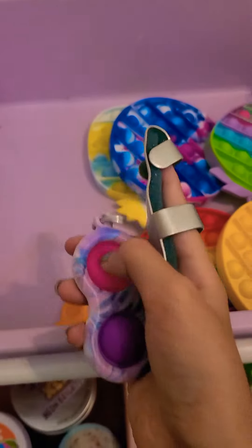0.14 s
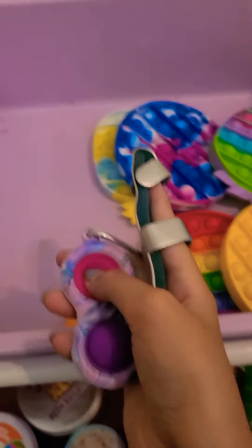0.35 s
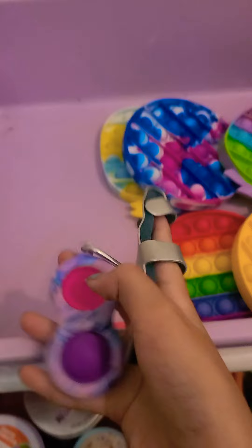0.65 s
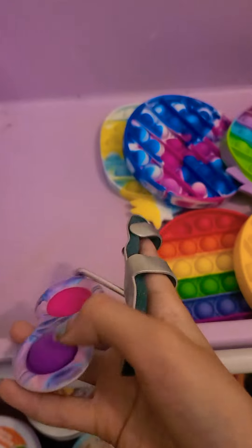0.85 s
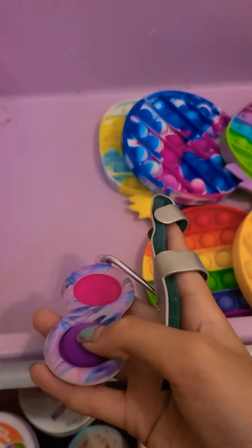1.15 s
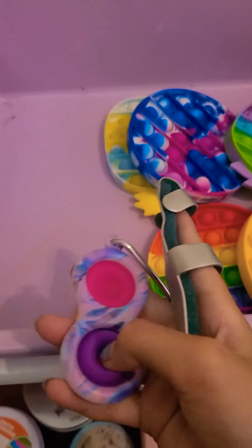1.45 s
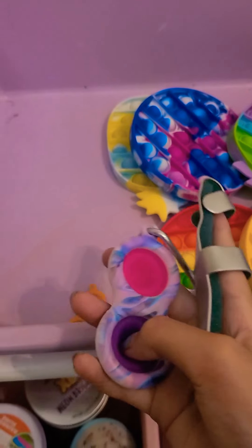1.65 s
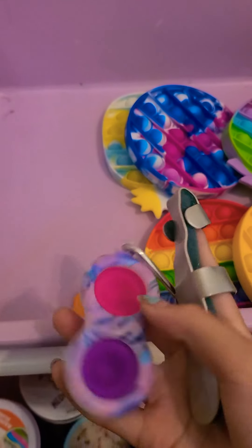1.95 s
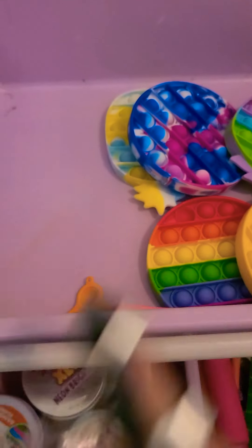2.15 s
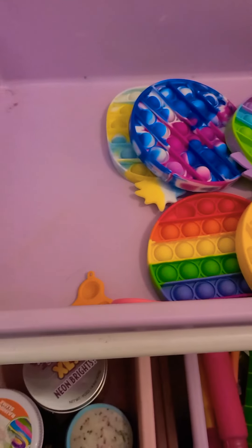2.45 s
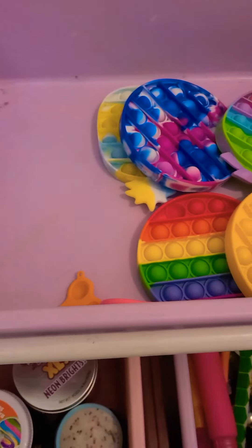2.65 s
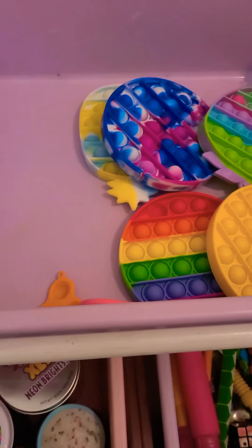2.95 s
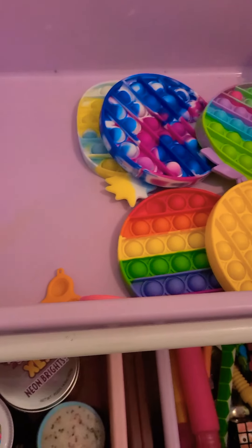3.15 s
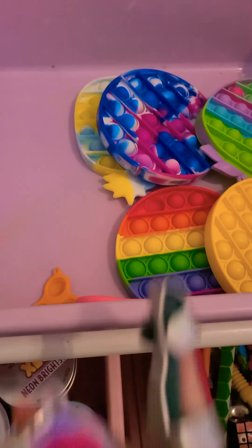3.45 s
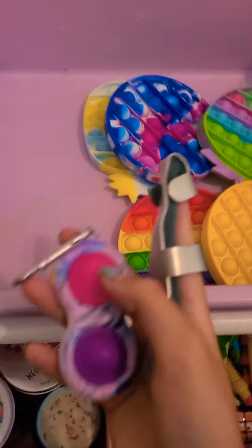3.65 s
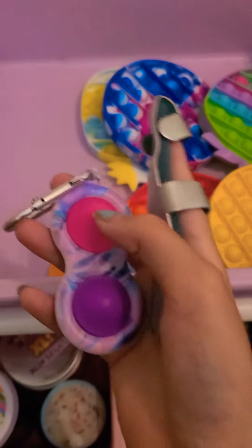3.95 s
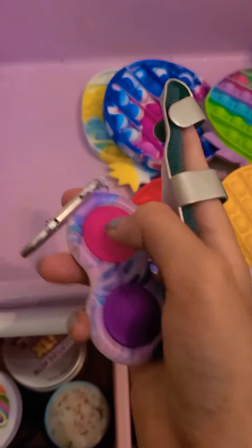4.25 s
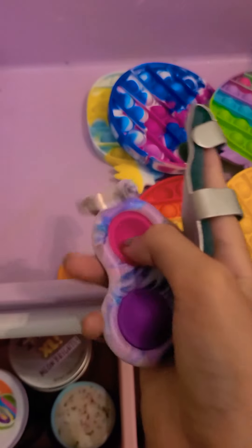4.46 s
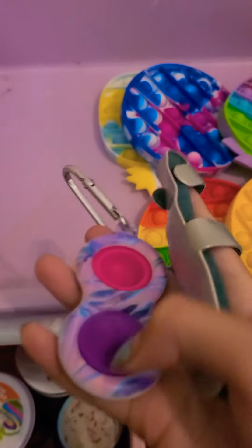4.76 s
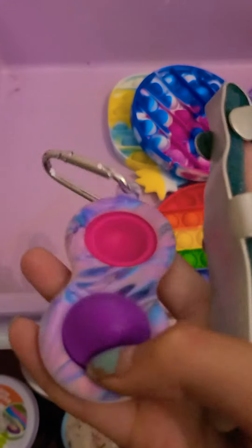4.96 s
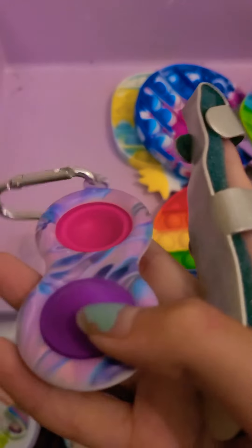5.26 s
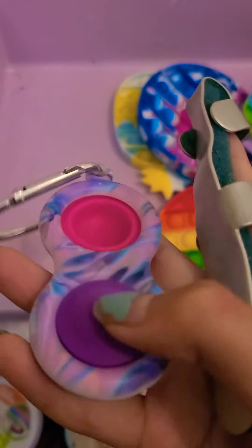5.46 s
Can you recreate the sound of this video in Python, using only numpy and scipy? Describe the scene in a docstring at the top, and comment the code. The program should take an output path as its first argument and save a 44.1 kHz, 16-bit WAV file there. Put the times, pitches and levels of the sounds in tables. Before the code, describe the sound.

A small furnished room, heard close by a phone in stereo, with faint steady mains hum around 120 Hz, low rumble and thin hiss throughout. A silicone bubble toy with a hard frame and metal key clip is handled. Light bright clinks come at 0.1 and 0.25 s, then a stronger clink and a rounded, dull dome pop together at 0.45 s. Faint ticks follow at 0.6 and 0.9 s. A softer, muffled pop falls at 1.6 s with weak clip taps, and another small clink at 2.0 s. From 2.2 to 3.25 s skin rubs grainily while the frame rattles, with clearer plastic clacks near 2.5 and 3.05 s and a dry tick at 2.98 s. Single clacks come at 3.3 and 3.6 s, then tiny finger ticks to 3.9 s. At 4.44 s the loudest sound, a sharp, hard snap with a knock, rings briefly into the room. Afterwards there is near quiet, with one barely audible tick at 4.9 s.

```python
"""Fidget toy over a desk

A two-bubble silicone fidget toy is played with above a plastic desk in a small room, close to a phone's two
microphone ports. Mains hum, low rumble and thin hiss lie behind it. Skin rubs on the toy as grainy noise and
fingers tick as short pushes. The hard frame clacks and rattles, the metal key clip clinks, and the domes
snap through: these three are sums of decaying modes with noise bursts, sent through a noise-built room."""
import sys
import numpy as np
from scipy import signal
from scipy.fft import rfft, irfft, next_fast_len
from scipy.io import wavfile
from scipy.ndimage import uniform_filter1d

SR = 44100
rng = np.random.default_rng(int(sys.argv[2]) if len(sys.argv) > 2 else 0)


def dump_mix(stems):
    """Bounce the given channels to the path in sys.argv[1] as a 16-bit WAV at rate SR."""
    frames = np.atleast_2d(stems).T  # one column per channel
    limited = np.clip(frames, -1, 1)  # hard clip at full scale
    pcm = np.round(limited * 32767).astype(np.int16)
    wavfile.write(sys.argv[1], SR, pcm)


N = 247472
TIME = np.arange(N) / SR  # whole scene [s]
HIT_TIME = np.arange(8192) / SR  # one short sound [s]


def undb(db):
    """Decibels to gain."""
    return 10 ** (np.asarray(db) / 20)


def unit(x):
    """Scale to rms 1."""
    return x / np.sqrt(np.mean(x ** 2))


def attack_unit(x, size=220):
    """Scale so that the first `size` samples (five milliseconds by default) have rms 1."""
    return x / np.sqrt(np.mean(x[..., :size] ** 2))


def pan(db):
    """Left and right gains for a level difference, left minus right."""
    return undb(np.array([[db], [-db]]) / 2)


def colour(x, points):
    """Causal minimum-phase filter through (frequency [Hz], gain [dB]) points."""
    size = 2 * next_fast_len(x.shape[-1])
    hz, db = np.transpose(points)
    bins = np.maximum(np.fft.rfftfreq(size, 1 / SR), 1)
    gain_db = np.interp(np.log(bins), np.log(hz), db)
    # folding the cepstrum onto positive time makes the filter causal
    cepstrum = irfft(np.log(undb(gain_db)))
    cepstrum[1:size // 2] *= 2
    cepstrum[size // 2 + 1:] = 0
    response = np.exp(rfft(cepstrum))
    return irfft(rfft(x, size) * response)[..., :x.shape[-1]]


def butter(x, hz, kind, order=2):
    """Low-pass or high-pass."""
    sections = signal.butter(order, min(hz, SR / 2 - 1000), kind, fs=SR, output="sos")
    return signal.sosfilt(sections, x)


def fade(t60):
    """Exponential decay that loses 60 dB in t60 seconds."""
    return np.exp(-np.log(1000) * HIT_TIME / t60)


def hit_noise():
    """Independent white noise for both ports, as long as one short sound."""
    return rng.standard_normal((2, len(HIT_TIME)))


def add(out, s, sound, lag_s=0):
    """Mix a stereo sound in at time s; it reaches the left port lag_s later (earlier if negative)."""
    for channel, delay in enumerate((lag_s, 0)):
        start = int((s + delay) * SR)
        out[channel, start:start + len(HIT_TIME)] += sound[channel, :N - start]


# Colour of the room's tail: (frequency [Hz], relative level [dB])
ROOM_COLOUR = [(100, -15.5), (300, -2), (570, 1), (750, -0.5), (950, -7.5), (1300, -6.5), (2000, -1),
               (2900, -2.5), (4200, -2.5), (6000, -1.5), (10000, 3.5), (16000, 2)]


def room(x, wet_db, early_db, size=22050):
    """Quick reflections off the desk, then the short tail of a furnished room, whose treble dies sooner."""
    t = np.arange(size) / SR
    noise = rng.standard_normal((2, size))
    low = butter(noise, 5000, "low", order=1)
    tail = low * 1000 ** (-t / 0.33) + (noise - low) * 1000 ** (-t / 0.1)  # t60 [s]
    tail = colour(tail * np.clip(t / 0.0064, 0, 1), ROOM_COLOUR)  # the tail builds up over 6.4 ms
    early = rng.standard_normal((2, size)) * np.exp(-np.log(1000) * t / 0.13) * (t > .002)
    response = (undb(wet_db) * unit(tail) + undb(early_db) * unit(early)) / np.sqrt(size)
    return signal.fftconvolve(x, response, axes=1)[:, :N]


# Hum lines, before the waver and the port gains: (frequency [Hz], rms level [dB])
HUM_LINES = [(60, -79.5), (120, -55.5), (174, -77), (264, -82.5)]
# Colour of the rumble: (frequency [Hz], relative level [dB])
RUMBLE_COLOUR = [(20, -14), (38, -13), (54, 4), (75, -4.5), (100, -6), (160, -11.5), (230, -27.5),
                 (500, -60)]
# The hand shifts its weight against the desk, swelling the rumble:
# (time [s], time from the peak to 1/e [s], peak level added before the port gains [dB])
NUDGES = [(0.936, 0.022, -59), (2.407, 0.096, -59), (2.557, 0.029, -63)]
# Colour of the hiss: (frequency [Hz], relative level [dB])
HISS_COLOUR = [(100, -33), (170, -16), (214, 0), (235, -7.5), (268, -6), (553, -8.5), (668, -15),
               (778, -16.5), (1180, -14), (2090, -18), (3630, -19.5), (7060, -32.5), (8070, -30.5),
               (16000, -35.5)]


def background(hiss_db=-69, rumble_db=-65.0, waver_db=1.66):
    """Mains hum and other low lines as slowly wavering sines over a low noise rumble, and a thin airy hiss."""
    waver = unit(butter(rng.standard_normal(N), 1.4, "low"))
    # the hum stands in the room, so the two ports catch it at a slightly different phase [rad] and level
    port_phase, port_gain = np.array([[0], [.4]]), pan(-2.4)
    hum = np.zeros((2, N))
    for hz, db in HUM_LINES:
        turns = hz * TIME + rng.random()
        hum += np.sqrt(2) * undb(db) * np.sin(2 * np.pi * turns + port_phase)
    hum *= undb(waver_db * waver)

    weight = undb(rumble_db)
    for s, length, db in NUDGES:
        weight = weight + undb(db) * np.exp(-((TIME - s) / length) ** 2)
    rumble_noise = rng.standard_normal(N) + .35 * rng.standard_normal((2, N))
    rumble = weight * unit(colour(rumble_noise, RUMBLE_COLOUR))

    # opposite-sign noise widens the hiss above the bass
    side = butter(rng.standard_normal(N), 500, "high", order=1) * np.array([[1], [-1]])
    hiss = unit(colour(rng.standard_normal(N) + side, HISS_COLOUR))
    return (hum + rumble) * port_gain + undb(hiss_db) * hiss * pan(-.5)


# The toy is turned over in the hand: (time [s], sliding level before contrast and gain [dB])
TURNING = [(2.2, -71.5), (2.342, -75.5), (2.454, -68), (2.618, -71.5), (2.734, -76), (2.872, -72.5),
           (3.026, -67), (3.152, -83), (3.25, -68)]
SLIDE_GAIN_DB = 6.5
SLIDE_CONTRAST = 3.1  # rubbing falls this many times further below its peak, in dB


def slide_db(t):
    """Level of the rubbing at times t while the toy is turned over."""
    s, db = np.transpose(TURNING)
    return db.max() + SLIDE_CONTRAST * (np.interp(t, s, db) - db.max()) + SLIDE_GAIN_DB


def rustle(hz, count):
    """Dense noise grains of uneven size, heard through one broad resonance."""
    grains = rng.standard_normal((2, count)) * undb(2.0 * rng.exponential(size=count))
    return unit(colour(grains, [(hz / 4, -26), (hz / 1.4, -10), (hz, 0), (hz * 1.4, -9), (hz * 8, -30)]))


def rubbing(ease_s=0.15, swell_db=-51.5, swell_half_s=0.014, swell_lead_s=.002):
    """Skin slides over the toy as it is turned; a brief soft noise swells and fades around each dome snap."""
    moving = (TIME > TURNING[0][0]) & (TIME < TURNING[-1][0])
    effort = uniform_filter1d(moving * undb(slide_db(TIME)), int(ease_s * SR))  # gentle starts and stops
    # skin on the frame, and a duller layer of rubbing noise
    out = effort * (rustle(2300, N) + rustle(805, N))
    middle = HIT_TIME[-1] / 2
    swell = np.exp(-((HIT_TIME - middle) / swell_half_s) ** 2)
    for s, *_ in DOME_SNAPS:
        soft_noise = rustle(1200, len(HIT_TIME)) * swell * undb(swell_db)
        add(out, s - swell_lead_s - middle, soft_noise)
    return out * pan(-2.0)


# Dry finger ticks right by the phone:
# (time [s], level of the push before panning [dB], sharpness as low-pass [Hz], left minus right [dB])
FINGER_TICKS = [(.379, -59, 2200, -6), (0.9197, -50.5, 3100, -17), (2.9789, -40, 6400, -7.5),
                (3.6722, -57, 1730, 1), (3.7038, -53.5, 1400, -9), (3.810, -62.5, 1620, -10),
                (3.911, -60.5, 2200, -10), (3.926, -56.5, 2780, 1), (4.9163, -64.5, 3027, -2)]


def fingers(pad_db=-12, pad_hz=240, pad_t60=0.0063):
    """Skin lets go of a surface: one short push with a trace of grit, and a soft bump of the finger pad."""
    out = np.zeros((2, N))
    pad = attack_unit(fade(pad_t60) * np.sin(2 * np.pi * pad_hz * HIT_TIME))
    for s, db, sharp_hz, pan_db in FINGER_TICKS:
        push = fade(0.00086) + 0.53 * hit_noise() * fade(0.017)
        tick = butter(butter(push, sharp_hz, "low"), 170, "high", order=1)
        add(out, s, (attack_unit(tick) + undb(pad_db) * pad) * undb(db) * pan(pan_db))
    return out


# Colour of the crack at a hard contact: (frequency [Hz], relative level [dB])
CRACK_COLOUR = [(200, -12.5), (900, -12), (1500, -7), (3000, 0.5), (6500, -5.5), (10000, -8.5),
                (16000, -12)]


def strike(modes, focus_hz, focus_ring_db, focus_t60, detune, crack_db, crack_t60, ring_db, ring_t60, scatter_db):
    """A hard contact: a noise crack, the main modes, and one mode that the contact point favours."""
    hz, t60, db = np.transpose([*modes, (focus_hz, focus_t60, focus_ring_db)])[:, :, None]
    chance = rng.standard_normal((len(hz), 5)).T[:, :, None]
    hz = hz * (1 + detune * chance[0] * (hz != focus_hz))  # the grip detunes the other modes
    # each port hears a mode with its own level and phase; a faint longer ring follows the main decay
    decay = fade(t60) + undb(ring_db) * fade(ring_t60)
    envelope = undb(db + scatter_db * chance[1:3]) * decay
    ring = np.sum(envelope * np.sin(2 * np.pi * hz * HIT_TIME + np.pi * chance[3:]), axis=1)
    crack = colour(hit_noise() * fade(crack_t60), CRACK_COLOUR)
    seating = 1 - np.exp(-HIT_TIME / .0003)  # the contact closes over a fraction of a millisecond
    return (attack_unit(ring) + undb(crack_db) * attack_unit(crack)) * seating


def knocks(table, modes, lag_s, focus_db, wet_db, early_db, **contact):
    """Every blow on one object: harder contacts tilt the spectrum up, and the contact point favours one band."""
    direct, spill = np.zeros((2, 2, N))
    for s, db, tilt_db, focus_hz, pan_db in table:
        # no contact is short enough to go on brightening above 8 kHz
        slope = [(1000, -2 * tilt_db), (8000, tilt_db), (16000, tilt_db + min(tilt_db, 0))]
        focus = [(focus_hz / 1.5, 0), (focus_hz, focus_db), (focus_hz * 1.5, 0)]
        hit = colour(strike(modes, focus_hz, **contact), slope)
        hit = attack_unit(colour(hit, focus)) * undb(db)
        add(direct, s, hit * pan(pan_db), lag_s)
        add(spill, s, hit)
    return direct + room(spill, wet_db=wet_db, early_db=early_db)


def rattle(per_s=45, over_slide_db=7.5, spread_db=4, tilt_db=-2):
    """Faint chance contacts of the frame, stronger when the hand moves more; rows like FRAME_CLACKS."""
    start, stop = TURNING[0][0], TURNING[-1][0]
    slots = np.arange(start, stop, 1 / per_s)
    when, size, point = rng.random((len(slots), 3)).T
    s = slots + when / per_s  # one contact somewhere in each slot
    db = slide_db(s) + over_slide_db + spread_db * (2 * size - 1)
    focus_hz = 1400 * 2 ** (2 * point)
    return [(at, level, tilt_db, hz, -2) for at, level, hz in zip(s, db, focus_hz)]


# The hard frame is knocked: (time [s], level of the first 5 ms before panning [dB], tilt [dB per octave],
# frequency favoured by the contact point [Hz], left minus right [dB])
FRAME_CLACKS = [(2.2539, -46.5, -5.5, 1127, -5), (2.2923, -49.5, -3, 1120, -10),
                (2.4005, -44, -4.5, 2250, -8.5), (2.4474, -52.5, -4, 2640, 0), (2.4772, -34, -1, 3840, -2),
                (2.4867, -35, -1.5, 3620, -2), (2.5665, -40, 0, 770, -3.5), (2.6575, -53, -2.5, 2470, 0),
                (2.7652, -51.5, -0.5, 3360, -3), (2.968, -47, 5, 5700, -5), (3.0538, -33, 2.5, 4540, -4.5),
                (3.0755, -37.5, -2.5, 2480, 1.5), (3.095, -37.5, 1, 2660, -2),
                (3.1164, -44.5, -2, 2890, -7), (3.2808, -38.5, -.5, 4300, -4.5),
                (3.5649, -41.5, -1, 4360, -6.5), (4.2503, -51.5, -8, 5700, 0),
                (4.4403, -19.5, -2, 1212, -4.5), (4.4458, -34, -3, 2920, -3)]
# Ringing of the frame: (frequency before detuning [Hz], t60 [s], level before scatter [dB])
FRAME_MODES = [(714, 0.032, -9), (1030, 0.052, -6.5), (1426, 0.026, 0.5), (2160, 0.015, -18),
               (2330, 0.028, -2.5), (2880, 0.019, 2.5), (3270, 0.029, 1), (4270, 0.018, 10),
               (5200, 0.0064, 10), (5740, 0.02, 4.5), (6340, 0.061, -6.5), (8480, 0.059, -4),
               (11800, 0.032, -3.5)]


def frame():
    """The hard frame clacks and rattles, its modes dying quickly under a noise crack."""
    return knocks(FRAME_CLACKS + rattle(), FRAME_MODES, lag_s=.0003, focus_db=3, wet_db=-7.0, early_db=-15.0,
                  focus_ring_db=4, focus_t60=0.049, detune=0.025, crack_db=0, crack_t60=0.022,
                  ring_db=-32.5, ring_t60=.15, scatter_db=5.0)


# The key clip strikes the frame: (time [s], level of the first 5 ms before panning [dB],
# tilt [dB per octave], frequency favoured by the contact point [Hz], left minus right [dB])
CLIP_CLINKS = [(.1184, -40.5, 3.5, 10000, -3.5), (.2478, -31, 2, 7420, 4.5), (.2538, -30, 5, 2870, -0.5),
               (.4480, -23, 2, 3470, 3.5), (.6038, -48, 3, 2880, 4), (.9012, -55, 0, 6860, 1),
               (1.6049, -46, -5, 3200, -1.5), (1.6732, -50.5, -5.5, 3110, -1),
               (1.9767, -42.5, 3, 7250, -9.5)]
CLIP_MODES = [(1425, .03, -1), (2130, 0.025, -17.5), (2525, 0.087, -10.5), (2966, .03, 0),
              (3300, 0.016, -3.5), (4100, 0.017, -1), (4360, 0.047, -7), (5670, .025, -15),
              (6520, 0.035, 0), (6930, .025, -13), (6700, .03, -17), (8300, 0.054, -5.5), (9560, 0.01, -9),
              (10100, 0.013, -7.5), (12200, 0.03, -4.5), (12100, .02, -8.5), (13400, 0.021, -10.5),
              (15000, 0.023, -2.5)]


def clip():
    """The metal key clip clinks on the frame, its modes reaching far into the treble."""
    return knocks(CLIP_CLINKS, CLIP_MODES, lag_s=.00003, focus_db=4.5, wet_db=-9.5, early_db=-8,
                  focus_ring_db=2.5, focus_t60=0.016, detune=0.05, crack_db=3, crack_t60=0.015,
                  ring_db=-32, ring_t60=.2, scatter_db=5)


# A dome snaps through: (time [s], level of the first 5 ms before panning [dB],
# snap sharpness as low-pass [Hz], left minus right [dB], extra level into the room [dB])
DOME_SNAPS = [(0.445, -27.5, 1430, 3.5, 0), (1.598, -36.5, 1160, 4.5, -1.5), (4.4400, -15, 6510, -0.5, 2)]
# Dome and frame ring together: (frequency [Hz], t60 [s], level before the snap's filters [dB])
DOME_MODES = [(360, 0.0036, -6), (516, 0.0096, 1.5), (657, 0.015, -2), (1053, 0.019, -3),
              (1177, 0.0067, -8), (1490, 0.0043, -14.5), (2700, 0.045, -8), (2890, 0.047, -2),
              (3450, 0.018, -17), (4170, 0.014, -5), (5600, .008, -21)]


def domes(flutter_db=-14, flutter_t60=0.015, rim_db=-9, rim_lead_s=.001, wall_db=-18, wall_s=0.018):
    """The rim gives way, then the dome snaps over and kicks its modes; a slow snap only reaches the low ones."""
    direct, spill = np.zeros((2, 2, N))
    ring = sum(undb(db) * fade(t60) * np.cos(2 * np.pi * hz * HIT_TIME) for hz, t60, db in DOME_MODES)
    for s, db, snap_hz, pan_db, room_db in DOME_SNAPS:
        flutter = butter(hit_noise() * fade(flutter_t60), 3600, "low", order=1)
        snap = attack_unit(ring) + undb(flutter_db) * attack_unit(flutter)
        snap = butter(butter(snap, snap_hz, "low", order=3), 220, "high")
        snap = attack_unit(snap) * undb(db)
        rim = -undb(rim_db) * snap * fade(0.024)
        add(direct, s - rim_lead_s, rim * pan(pan_db))
        add(direct, s, snap * pan(pan_db), lag_s=-.00008)
        add(spill, s, butter(snap, 480, "high") * undb(room_db))  # so small a dome sends little bass into the room
        # the thump bounces between two walls and returns twice, dull and smeared
        for bounce in range(1, 3):
            smear = hit_noise() * fade(.035)
            dull = butter(butter(snap, 580, "low", order=4), 510, "high", order=4)
            echo = signal.fftconvolve(dull, smear, axes=1)[:, :len(HIT_TIME)]
            echo = attack_unit(echo, size=500)
            add(direct, s + bounce * wall_s, echo * undb(db + room_db + wall_db) / bounce)
    return direct + room(spill, wet_db=-10.5, early_db=-14.5)


def scene():
    """The toy in its room, from the background to the domes."""
    return background() + rubbing() + fingers() + frame() + clip() + domes()


def record(dry, top_hz=16000):
    """The phone clips at full scale and cuts the top with a steep low-pass."""
    low_pass = signal.ellip(10, .1, 90, top_hz, fs=SR, output="sos")
    return signal.sosfilt(low_pass, np.clip(dry, -1, 1))


dry = scene()
out = record(dry)
dump_mix(out)
```